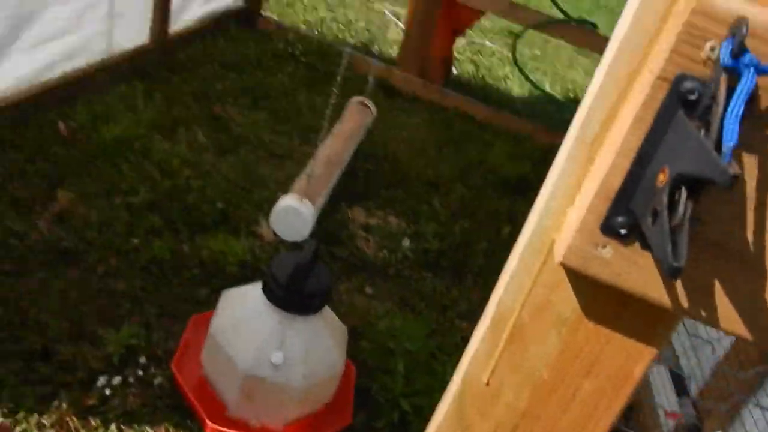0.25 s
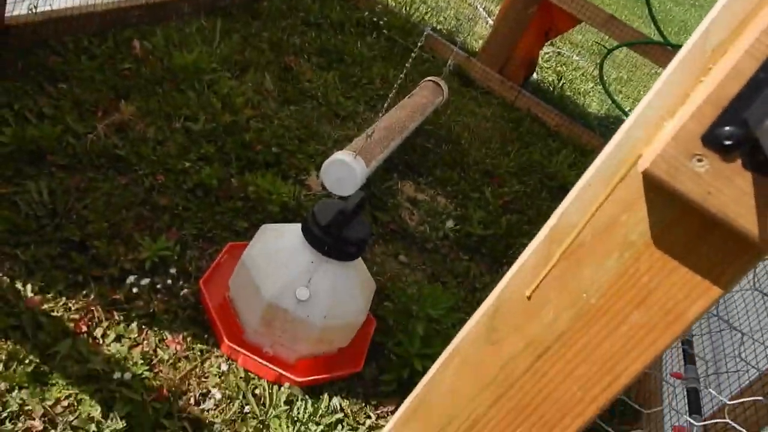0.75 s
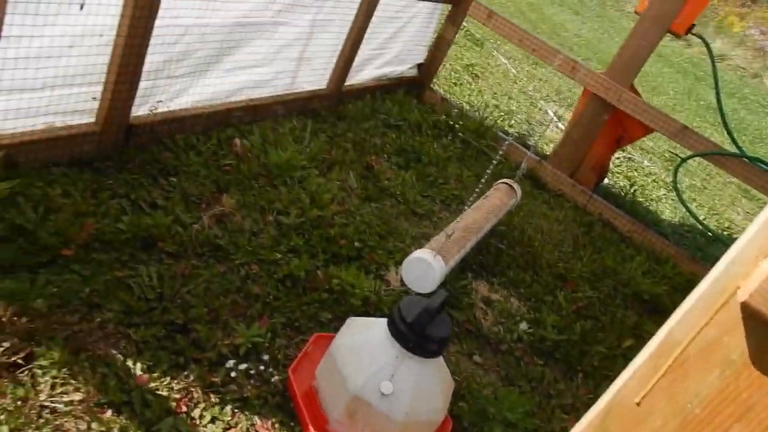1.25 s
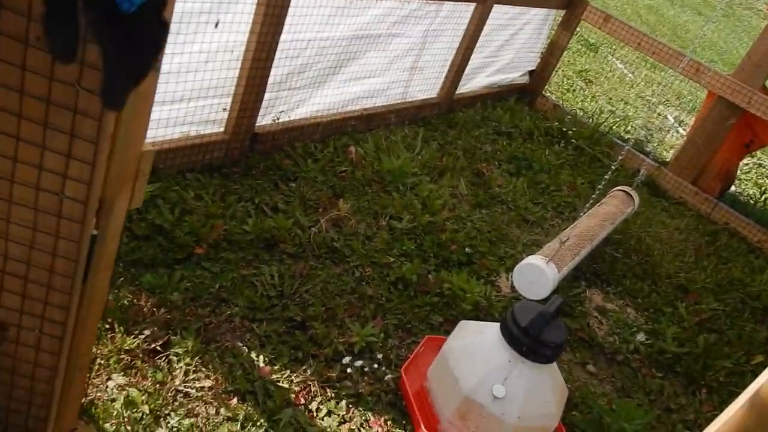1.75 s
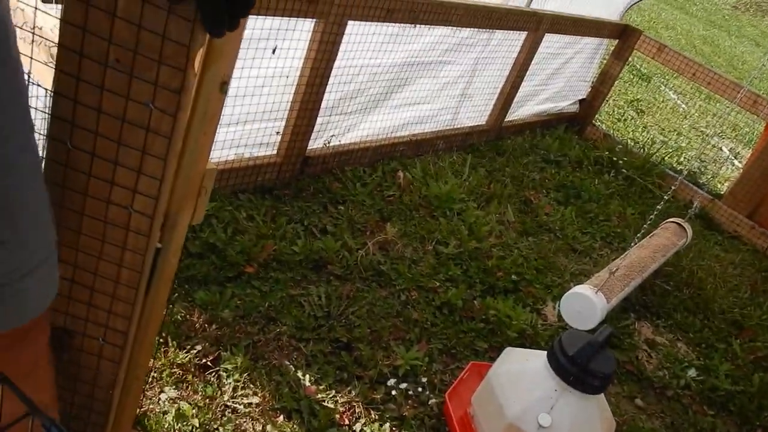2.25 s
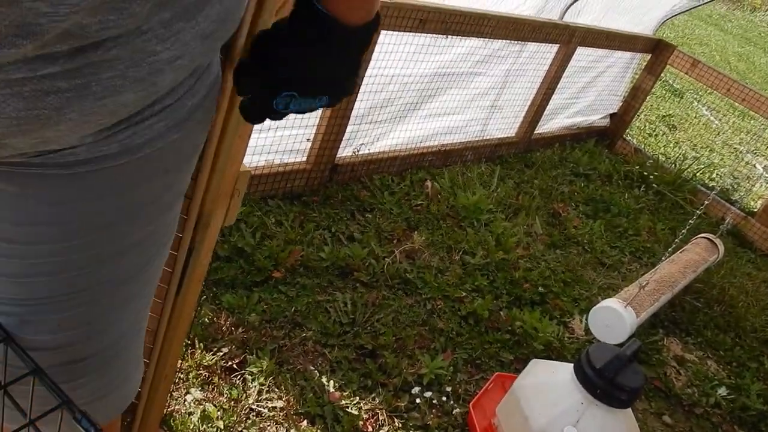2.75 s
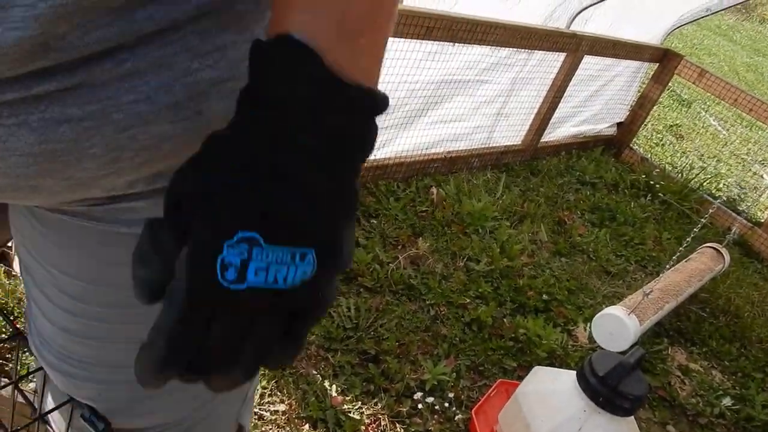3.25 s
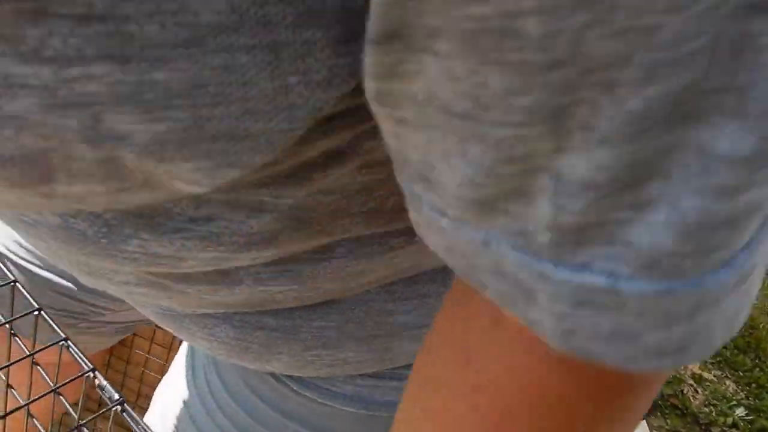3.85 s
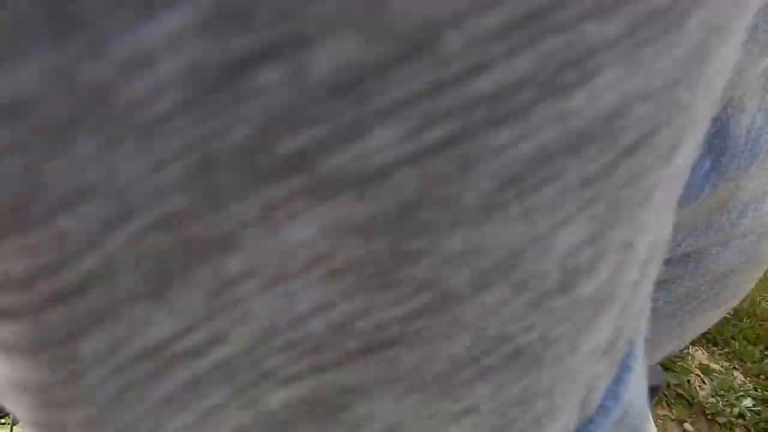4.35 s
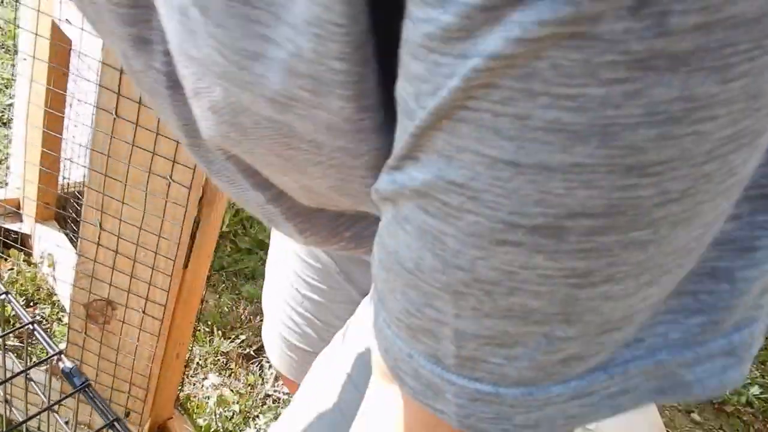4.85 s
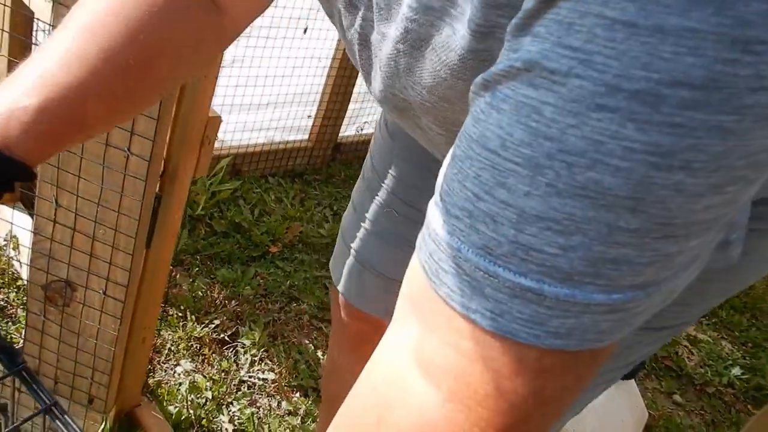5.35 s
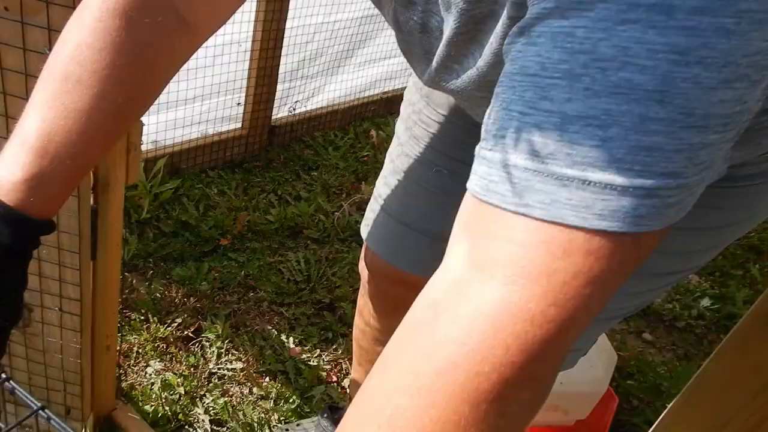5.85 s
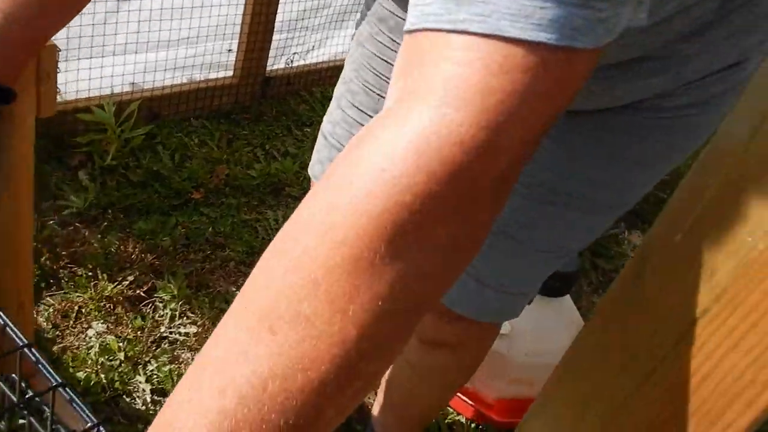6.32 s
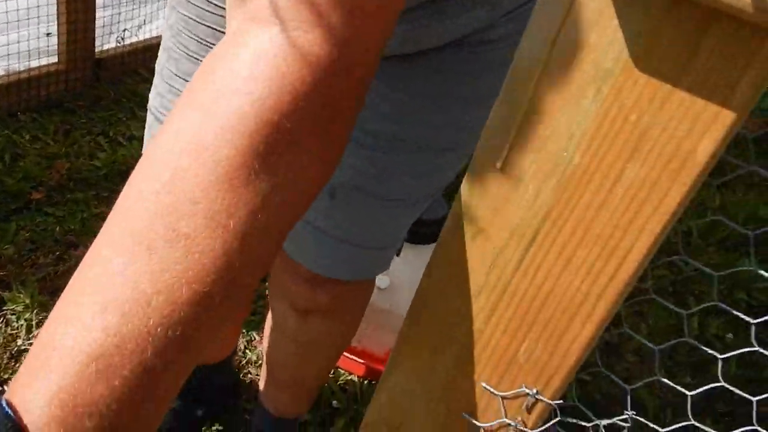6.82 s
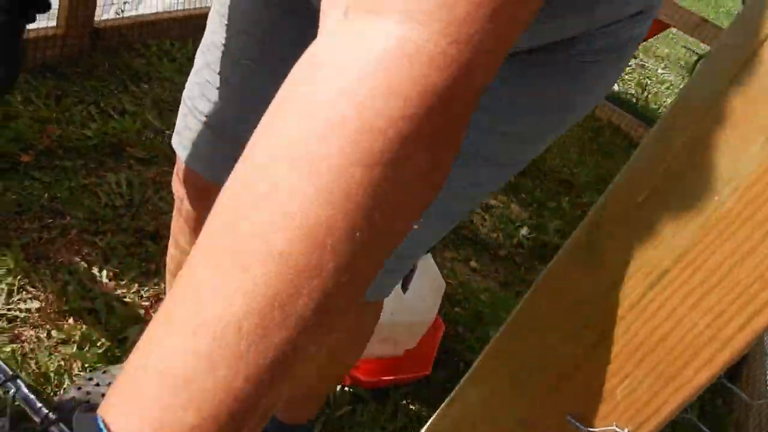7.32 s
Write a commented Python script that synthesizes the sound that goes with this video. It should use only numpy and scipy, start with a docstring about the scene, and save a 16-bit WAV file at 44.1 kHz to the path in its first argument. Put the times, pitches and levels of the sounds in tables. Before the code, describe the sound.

Many young chicks peep close by, dense then sparse then busy again, as a wire crate clanks, taps and scrapes over grass outdoors.

```python
"""Young chicks peep close by in a wire crate that is being shifted through the door of a garden run.
Their calls are gliding sine whistles: falling or arched peeps, rasps with a low voice, chips and two trills;
fainter chicks peep at the back. Noise bursts and decaying sines make the crate clank, shiver, tick and ping.
Grainy coloured noise makes the grass, wood and cloth, dying low sines the bumps, and steady low noise
the faint outdoor rumble under it all."""
import sys
import numpy as np
from scipy import signal
from scipy.fft import rfft, irfft, next_fast_len
from scipy.io import wavfile
from scipy.ndimage import uniform_filter1d, map_coordinates

SR = 44100
rng = np.random.default_rng(int(sys.argv[2]) if len(sys.argv) > 2 else 0)


def to_wav(s):
    """Save 16-bit WAV."""
    ch = np.atleast_2d(s).T  # columns
    pcm = np.round(np.clip(ch, -1, 1) * 32767)  # PCM
    wavfile.write(sys.argv[1], SR, pcm.astype(np.int16))


N = 334278
TIME = np.arange(N) / SR

# Near chicks, clear falling peeps: t/s, length/s, start f/Hz, end f/Hz, level/dB
FALLING_PEEPS = [(0.04, 0.12, 3655, 1977, -33), (0.085, 0.018, 2300, 1854, -22),
                 (.088, 0.085, 2743, 2110, -25.5), (.335, .035, 3460, 2450, -32.5),
                 (0.365, 0.064, 4070, 3240, -39), (0.428, 0.083, 2670, 1690, -27.5),
                 (0.553, 0.057, 3040, 2130, -28.5), (0.629, 0.056, 2900, 1950, -31.5),
                 (0.787, 0.067, 4010, 3050, -35.5), (0.836, 0.07, 2520, 2180, -25.5),
                 (0.91, 0.084, 2450, 1986, -30.5), (1.026, 0.092, 2664, 1697, -26),
                 (1.072, 0.089, 3320, 2073, -25), (1.15, .075, 2906, 2180, -28),
                 (1.406, 0.11, 3270, 2298, -26), (1.45, 0.021, 2300, 1860, -30.5),
                 (1.545, 0.056, 2600, 2060, -36.5), (1.614, 0.044, 3190, 1984, -29.5),
                 (1.684, 0.025, 3180, 2255, -29.5), (3.553, 0.033, 2900, 1870, -35),
                 (3.682, 0.041, 2500, 2054, -30.5), (3.736, 0.045, 2980, 2273, -18.5),
                 (3.831, 0.031, 2700, 2110, -29.5), (3.876, 0.084, 2844, 2196, -26.5),
                 (3.992, 0.055, 2760, 1900, -30.5), (4.23, 0.067, 3200, 2600, -42),
                 (4.261, 0.059, 2460, 1995, -32), (4.401, 0.07, 3200, 2310, -31),
                 (4.495, 0.038, 2700, 1955, -27), (4.742, 0.033, 2900, 1790, -22.5),
                 (4.778, 0.078, 2740, 1870, -32), (4.835, 0.086, 2440, 1950, -35.5),
                 (4.943, 0.061, 2280, 1980, -34.5), (5.076, 0.073, 2890, 2040, -28),
                 (5.088, 0.038, 3550, 2520, -29), (5.175, 0.045, 3130, 1874, -26.5),
                 (5.375, 0.041, 3357, 2190, -29), (5.472, 0.054, 2285, 1774, -29),
                 (5.667, 0.01, 2330, 1980, -22.5), (5.863, 0.048, 3020, 1930, -31),
                 (5.969, 0.027, 2586, 2050, -21.5), (6.405, 0.038, 2550, 1540, -24.5),
                 (6.473, 0.056, 2790, 2225, -22.5), (6.604, 0.016, 2760, 2100, -21.5),
                 (6.659, 0.025, 2780, 2240, -34), (6.839, 0.045, 2590, 1980, -35),
                 (6.944, 0.086, 4230, 3420, -37.5), (7.279, 0.071, 3630, 2100, -34.5),
                 (7.458, 0.055, 2690, 1743, -30.5)]
# Near chicks, arched peeps sung with both sides of the syrinx:
# t/s, length/s, top f/Hz, level/dB, upper voice level/dB re the lower
ARCHED_PEEPS = [(0.27, 0.095, 2587, -23, -21), (0.515, 0.071, 2736, -29.5, -1),
                (0.66, 0.086, 2850, -27.5, -5), (2.542, 0.12, 2883, -33, -15),
                (2.756, 0.068, 2994, -35, -12), (2.952, 0.074, 2800, -37.5, -33),
                (3.135, 0.093, 2794, -33, -4.5), (3.302, 0.084, 2930, -36.5, -8.5),
                (3.476, 0.093, 3130, -38, -29), (4.567, 0.072, 2835, -26, -7.5),
                (5.538, 0.093, 2887, -26, -11.5), (7.008, 0.074, 2534, -19.5, -28),
                (7.517, 0.1, 2634, -27, -6)]
# Near chicks, strained peeps with a low voice breaking in: t/s, length/s, start f/Hz, low voice f/Hz, level/dB
RASPY_PEEPS = [(0.517, 0.034, 2237, 1063, -30.5), (1.344, 0.074, 2820, 994, -29.5),
               (1.803, 0.044, 2970, 928, -24), (2.391, 0.05, 2890, 1133, -31.5),
               (3.95, 0.047, 2607, 1145, -28.5), (4.108, 0.044, 2280, 1083, -35),
               (4.666, 0.079, 2514, 1117, -31), (4.9, 0.0397, 2227, 1060, -31),
               (5.018, 0.047, 2660, 1169, -29.5), (5.231, 0.0307, 2450, 1430, -33),
               (6.219, 0.029, 2600, 1365, -30.5), (6.626, 0.024, 2495, 1180, -31),
               (6.803, 0.043, 2784, 1200, -26), (7.379, 0.067, 2610, 1034, -31.5)]
# Near chicks, short chips: t/s, held f/Hz, level/dB
CHIP_CALLS = [(0.255, 1646, -30.5), (0.331, 1094, -34), (0.414, 1470, -32.5), (0.845, 1140, -31.5),
              (1.514, 1384, -27.5), (1.835, 1620, -31), (3.264, 1432, -19.5), (3.723, 1410, -25.5),
              (5.234, 1420, -27.5), (5.403, 1674, -26), (5.662, 1444, -28), (6.218, 1516, -27.5)]
# Near chicks, trills: t/s, length/s, start f/Hz, end f/Hz, swing f/Hz, warble rate/Hz, level/dB, gap depth/0-1
TRILL_CALLS = [(3.221, 0.087, 3007, 2530, 422, 42, -22, 0.94),
               (7.001, 0.083, 3465, 2604, 320, 45, -21.5, 0.06)]
# Crate, jolts that set the mesh rattling: t/s, level/dB, t60 of the rattle/s
MESH_JOLTS = [(.992, -32.5, 0.9), (3.326, -41.5, 0.46), (3.806, -31, 0.4), (4.471, -34.5, 0.48),
              (6.01, -26.5, 0.4), (6.02, -31.5, 0.45), (6.062, -29, 0.33), (6.692, -18, 0.061),
              (6.705, -27.5, 0.35), (7.045, -37, 0.79)]
# Crate, single taps of wire on wood: t/s, level/dB
WIRE_TAPS = [(2.843, -28), (3.976, -22.5), (4.868, -34), (4.9257, -34.5), (5.151, -46), (5.298, -33),
             (5.313, -36), (5.5965, -24.5), (5.71, -46), (6.826, -26), (7.1415, -19)]
# Crate, ringing modes of the mesh: f/Hz, level/dB
MESH_MODES = [(3009, -0.5), (3331, 6.5), (3560, -3), (5170, 7.5), (5420, 15), (7897, -15)]
# Crate, pings of a loose wire: t/s, level/dB
WIRE_PINGS = [(3.812, -38), (6.755, -41.5), (7.149, -43)]
# Crate, modes of that loose wire: f/Hz, level/dB
LOOSE_WIRE_MODES = [(8800, -1), (14150, -20), (15300, -19)]
# Feet and crate shuffling over the grass: t/s, hold/s, level/dB
GRASS_SCUFFS = [(0, .39, -45), (.45, 0.795, -48.5), (3.33, 0.705, -48.5), (4.49, 0.22, -49),
                (4.75, 0.93, -54.5), (5.72, 0.9, -47), (6.37, 0.075, -40), (6.72, 0.453, -40.5),
                (7.2, 0.3, -47)]
# Crate scraping along the wooden door frame: t/s, hold/s, level/dB
FRAME_SCRAPES = [(2.543, 0.027, -40), (2.58, 0.29, -47.5), (4.22, 0.19, -48), (5.68, 0.34, -43),
                 (7.39, 0.052, -34)]
# Rustle of clothes and wire, rising and falling: t/s, level/dB
RUSTLE_COURSE = [(0.0, -40), (1.06, -48), (1.2, -44), (1.63, -47), (1.88, -50), (2.7, -40.5), (3.04, -45),
                 (3.95, -43.5), (4.24, -46.5), (4.66, -43.5), (5.4, -49.5), (5.7, -39.5), (6.46, -47.5),
                 (6.63, -40), (7.3, -40), (7.58, -45)]
# Bright brushes along the mesh: t of the peak/s, level/dB, rise time constant/s, t60/s
MESH_BRUSHES = [(2.119, -35, 0.028, 0.68), (3.78, -46, 0.18, 1), (5.861, -42, .06, 0.29)]
# Dull knocks of the crate and bumps on the microphone: t/s, level/dB, f/Hz
DULL_BUMPS = [(0.119, -18, 120), (0.216, -19.5, 268), (0.239, -13.5, 102), (.654, -24, 236),
              (.794, -25, 254), (3.577, -19, 310), (4.691, -22.5, 247), (5.875, -27, 78), (6.42, -35, 315)]
# Relative spectrum of the mesh contacts and taps: f/Hz, level/dB (per Hz)
MESH_SPECTRUM = [(120, -9.5), (250, 4), (800, -3), (3000, -1), (5400, -1), (6800, -13.5), (12500, -24.5),
                 (15500, -32.5)]
# Relative spectrum of the grass scuffs: f/Hz, level/dB (per Hz)
SCUFF_SPECTRUM = [(60, -8.5), (290, 7.5), (480, -2.5), (2000, -12), (4000, -44.5)]
# Relative spectrum of the scrapes on wood: f/Hz, level/dB (per Hz)
SCRAPE_SPECTRUM = [(300, -9), (550, -6), (780, -1), (1300, -10.5), (1800, -1), (4000, -48)]
# Relative spectrum of the clothes and wire: f/Hz, level/dB (per Hz)
RUSTLE_SPECTRUM = [(900, 13.5), (2600, 15), (3900, 8), (5200, 10), (6800, -9.5), (12000, -23.5),
                   (15000, -58.5)]
# Relative spectrum of the brushes along the mesh: f/Hz, level/dB (per Hz)
BRUSH_SPECTRUM = [(800, -13), (2800, -3), (5200, 5), (7000, -13.5), (12500, -23), (15000, -40)]
# Relative spectrum of the outdoor rumble: f/Hz, level/dB (per Hz)
OUTDOOR_SPECTRUM = [(25, -6), (70, 2), (108, 11), (160, -3), (400, -29.5), (2000, -40), (8000, -41)]
# Likeness of the left and right noise: f/Hz, likeness/0-1
STEREO_LIKENESS = [(2000, 0.97), (5000, 0.48), (9000, 0)]

# The voice slides in faintly from above and trails off below: length, interval, level at the far ends
SLIDE_S, SLIDE_OCT, SLIDE_DB = .018, 0.1323, -16
SAG = 0.0265  # share by which the middle of a fall hangs below an even glide
# Arch: rise and fall as shares of the top pitch; top as a share of the length; upper over lower pitch
ARCH_RISE, ARCH_FALL, ARCH_TOP_AT, UPPER_VOICE_RATIO = 0.0916, .26, 0.2786, 1.247
RASP_END_HZ, RASP_GRAIN = 2077, .5
LOW_VOICE_DB, LOW_VOICE_FALL_OCT = -4, 0.247  # level re its peep; sink over the call
LOW_VOICE_JITTER, LOW_VOICE_FLUTTER_DB = .075, 4.5  # spread of pitch as a share; spread of each harmonic
CHIP_S, CHIP_START_OCT, CHIP_DROP_S = 0.023, 0.59, 0.00278  # length; start above the held pitch; time constant
MELLOW_OCTAVE_DB = -28  # second harmonic of chips and trills
# Second harmonic of peeps; spread of any second harmonic; pitch up to which the beak passes it
OCTAVE_DB, OCTAVE_SPREAD_DB, BEAK_CUT_HZ = -24, 4, 5500
# Far chicks: level re the near peep; middle pitch and largest departure; strain 0-1
FAR_DB, FAR_HZ, FAR_SPREAD_OCT, FAR_RASP = -12.5, 2896, 0.2, .9
FAR_S, FAR_WITHIN_S = .065, .03  # middle length; largest lead or lag on the near peep
STROKE_ATTACK_S, STROKE_T60_S = 0.0036, 0.17  # swell and dying away of each scuff or scrape
OUTDOORS_DB, LEFT_DB = -53, 1.5  # rumble level; lift on the left and equal cut on the right
CUTOFF_HZ = 15500


def chicks():
    """The nearest chicks peep, rasp, chip and trill, each call from its own place in the crate."""
    out = np.zeros((2, N))
    for s, level_db, call in falling_peeps() + arched_peeps() + raspy_peeps() + chips() + trills():
        add(out, s, somewhere_in_crate(from_db(level_db) * call))
    return out


def falling_peeps():
    """Clear falling whistles, loudest where their pitch comes nearest the throat resonance."""
    return [(s - SLIDE_S, level_db, peep(fall(length, start_hz, end_hz)))
            for s, length, start_hz, end_hz, level_db in FALLING_PEEPS]


def arched_peeps():
    """Both sides of the syrinx sing the same arch at a fixed pitch ratio."""
    calls = []
    for s, length, top_hz, level_db, upper_db in ARCHED_PEEPS:
        hz = arch(length, top_hz)
        lower = peep(hz, ends_db=-9)
        upper = peep(hz * UPPER_VOICE_RATIO, ends_db=-8)
        calls.append((s - SLIDE_S, level_db, lower + from_db(upper_db) * upper))
    return calls


def raspy_peeps():
    """A strained falling whistle, with a low voice breaking in under it."""
    calls = []
    for s, length, start_hz, low_hz, level_db in RASPY_PEEPS:
        whistle = peep(fall(length, start_hz, RASP_END_HZ), rasp=1, ends_db=-2.0)
        calls.append((s - SLIDE_S, level_db, whistle))
        calls.append((s, level_db + LOW_VOICE_DB, low_voice(length, low_hz)))
    return calls


def chips(edge=0.067):
    """Short whistles that drop very quickly onto a held pitch."""
    calls = []
    for s, held_hz, level_db in CHIP_CALLS:
        u = progress(CHIP_S)
        hz = held_hz * 2 ** (CHIP_START_OCT * np.exp(-u * CHIP_S / CHIP_DROP_S))
        calls.append((s, level_db, syrinx(hz, MELLOW_OCTAVE_DB) * swell(u, edge)))
    return calls


def trills(edge=0.48):
    """Whistles whose pitch warbles as it sinks."""
    calls = []
    for s, length, start_hz, end_hz, swing_hz, rate, level_db, gaps in TRILL_CALLS:
        u = progress(length)
        warble = np.cos(2 * np.pi * rate * length * u)
        hz = start_hz + (end_hz - start_hz) * u + swing_hz * warble
        # the voice weakens at the top of every warble, by the gap depth
        voiced = 1 - np.clip(gaps * np.minimum(.5 + 2 * warble, 1), 0, 1)
        calls.append((s, level_db, syrinx(hz, MELLOW_OCTAVE_DB) * voiced * swell(u, edge)))
    return calls


def peep(hz, rasp=0, ends_db=-9, throat_hz=2420, throat_width_hz=620):
    """One call swells and fades along its pitch, favoured near the throat resonance."""
    slide = round(SLIDE_S * SR)
    body = from_db(ends_db * np.linspace(-1, 1, len(hz)) ** 2)
    padded = np.pad(body, slide, constant_values=from_db(SLIDE_DB))
    envelope = uniform_filter1d(padded, size=200)
    slide_ends = (hz[0] * 2 ** SLIDE_OCT, hz[-1] / 2 ** SLIDE_OCT)
    hz = np.pad(hz, slide, "linear_ramp", end_values=slide_ends)
    throat = 1 / np.hypot(1, (hz - throat_hz) / throat_width_hz)
    loudness = envelope * np.hanning(len(hz)) ** 0.083 * throat
    return syrinx(hz, OCTAVE_DB, rasp) * loudness / loudness.max()


def syrinx(hz, octave_db, rasp=0, waver=.013, jitter=0.0091, rasp_jitter=0.035,
           flutter_db=3.0, rasp_flutter_db=4):
    """A slightly hoarse whistle with its octave; under strain the pitch shakes and the air flow catches abruptly."""
    size = len(hz)
    shake = (jitter + rasp_jitter * rasp) * drift(880.4, size)
    hz = hz * (1 + waver * drift(170, size) + shake)
    phase = 2 * np.pi * np.cumsum(hz) / SR
    catches = from_db((flutter_db + rasp_flutter_db * rasp) * np.tanh(2 * drift(149.8, size)))
    beak = 1 / np.hypot(1, (hz / BEAK_CUT_HZ * 2) ** 10)
    octave = from_db(octave_db + OCTAVE_SPREAD_DB * drift(18, size)) * np.sin(2 * phase) * beak
    grain = 1 + (0.12 + RASP_GRAIN * rasp) * drift(1300, size)
    return rms_one((np.sin(phase) + octave) * catches * grain)


def low_voice(length, low_hz, fundamental_db=-5, third_db=-6):
    """A rough, broken, sinking tone of its own pitch; the throat favours its second harmonic."""
    u = progress(length)
    sinking = low_hz * 2 ** (LOW_VOICE_FALL_OCT * (.5 - u))
    hz = sinking * (1 + LOW_VOICE_JITTER * drift(694, len(u)))
    phase = 2 * np.pi * np.cumsum(hz) / SR
    voice = np.zeros(len(u))
    for k, db in enumerate((fundamental_db, 0, third_db), 1):
        flutter = LOW_VOICE_FLUTTER_DB * drift(197, len(u))
        voice += from_db(db + flutter) * np.sin(k * phase)
    return rms_one(voice) * swell(u, 0.22)


def progress(length):
    """0..1 over a call of this length in seconds."""
    return np.linspace(0, 1, round(length * SR))


def fall(length, start_hz, end_hz):
    """Pitch of a falling peep: steep at first, then easing."""
    u = progress(length)
    return start_hz * (end_hz / start_hz) ** u * (1 - SAG * np.sin(np.pi * u))


def arch(length, top_hz):
    """Pitch of an arched peep: a short rise, a rounded top, a longer fall."""
    past_top = progress(length) - ARCH_TOP_AT
    rising = ARCH_RISE * (past_top / ARCH_TOP_AT) ** 2
    falling = ARCH_FALL * np.abs(past_top / (1 - ARCH_TOP_AT)) ** 1.2
    return top_hz * (1 - np.where(past_top < 0, rising, falling))


def swell(u, edge):
    """Rounded rise and fall over u = 0..1; a small edge makes both steep, but never quicker than a few ms."""
    from_ends_s = np.minimum(u, 1 - u) * len(u) / SR
    return np.abs(np.sin(np.pi * u)) ** edge * np.tanh(from_ends_s / .0015) ** 2


def somewhere_in_crate(sound, count=3):
    """Each call has its own place, with its own quick reflections from the tray and boards nearby."""
    out = np.zeros((2, len(sound) + SR // 20))
    add(out, 0, sound)
    for delay in rng.uniform(.001, .014, count):
        add(out, delay, sound * rng.normal(0, .13))
    balance_db = .4 * rng.standard_normal() * np.array([[1], [-1]])
    return out * from_db(balance_db)


def far_chicks():
    """Chicks at the back peep faintly around each near falling peep, louder around loud ones."""
    out = np.zeros((2, N))
    for s, _, _, _, level_db in FALLING_PEEPS:
        lag, stretch, pitch = rng.uniform(-1, 1, size=3)
        hz = arch(FAR_S * 1.7 ** stretch, FAR_HZ * 2 ** (FAR_SPREAD_OCT * pitch))
        call = from_db(level_db + FAR_DB) * peep(hz, FAR_RASP)
        add(out, s - SLIDE_S + FAR_WITHIN_S * lag, somewhere_in_crate(call))
    return out


def crate(wire_db=-19):
    """Struck mesh and wood give short noisy contacts, over which the wires ring and ping."""
    contacts, ringing = rattles()
    return colour(contacts + taps(), MESH_SPECTRUM) + from_db(wire_db) * ringing + pings()


def rattles(rise_s=0.00041):
    """Jolts make the loose panels chatter in uneven, dying bursts; every jolt rings the wires in its own way."""
    contacts, ringing, t = np.zeros((2, N)), np.zeros((2, N)), TIME[:SR]
    for s, level_db, t60 in MESH_JOLTS:
        envelope = from_db(level_db - 60 * t / t60) * np.tanh(t / rise_s)
        rattle = envelope * rebounds() * rng.standard_normal((2, SR))
        add(contacts, s, rattle)
        add(ringing, s, signal.fftconvolve(rattle, wire_ring()[None], axes=1))
    return contacts, ringing


def rebounds(per_s=90, size=SR):
    """Envelope of loose wires striking again and again at uneven moments, each strike sharp and short; rms 1."""
    strikes = (rng.random(size) < per_s / SR) * rng.uniform(.3, 1, size)
    dying = signal.lfilter([1], [1, -np.exp(-1 / (.004 * SR))], strikes)  # 4 ms time constant
    return rms_one(.45 + dying)


def wire_ring(t60=0.13, size=SR // 2, count=3):
    """Ring of the mesh when struck at a random place: each place favours other wires."""
    hz, level_db = np.repeat(MESH_MODES, count, axis=0).T
    # neighbouring wires are tuned slightly apart, so their ring beats
    hz = hz * (1 + .004 * rng.standard_normal(len(hz)))
    strength = from_db(level_db) * rng.standard_normal(len(hz)) / np.sqrt(count)
    decay = from_db(-60 * TIME[:size] / t60)
    tones = strength @ np.sin(2 * np.pi * np.outer(hz, TIME[:size]))
    return tones * decay / np.sqrt(np.sum(decay ** 2) / 2)


def taps(t60=0.011, trim_db=-2):
    """Single taps are dying noise bursts; wood cushions them, so they are duller."""
    envelope = np.zeros(N)
    for s, level_db in WIRE_TAPS:
        add(envelope, s, from_db(level_db + trim_db - 60 * TIME[:SR // 10] / t60))
    cushion = signal.butter(2, 5000, fs=SR, output="sos")
    return signal.sosfilt(cushion, envelope * rng.standard_normal((2, N)) + 1e-18)


def pings(t60=0.26):
    """A free wire end rings high and thin."""
    out, t = np.zeros(N), TIME[:SR]
    ring = sum(from_db(db - 60 * t / t60) * np.sin(2 * np.pi * hz * t) for hz, db in LOOSE_WIRE_MODES)
    for s, level_db in WIRE_PINGS:
        add(out, s, from_db(level_db) * ring)
    return out


def handling(scuff_db=1, rustle_db=-4):
    """Feet scuff the grass and the crate scrapes wood while cloth and wire rustle, all in grainy contacts."""
    strokes_db = 2 * drift(30, N)  # shared unevenness
    scuff = pushes(GRASS_SCUFFS) * from_db(scuff_db + strokes_db) * grains(per_s=150, spread_db=3.0)
    scrape = pushes(FRAME_SCRAPES) * from_db(strokes_db) * grains(per_s=180, spread_db=3.0)
    course_db = np.interp(TIME, *np.transpose(RUSTLE_COURSE))
    rustle = from_db(course_db + rustle_db + strokes_db / 2) * grains(per_s=730, spread_db=3.5)
    ground_and_wood = colour(scuff, SCUFF_SPECTRUM) + colour(scrape, SCRAPE_SPECTRUM)
    return ground_and_wood + colour(rustle, RUSTLE_SPECTRUM) + brushes()


def brushes():
    """Long bright noise swells up and dies away as something brushes along the mesh."""
    envelope = np.zeros(N)
    for s, level_db, rise, t60 in MESH_BRUSHES:
        dying = from_db(level_db - 60 * np.maximum(TIME - s, 0) / t60)
        envelope += dying * np.exp(np.minimum(TIME - s, 0) / rise)
    return colour(envelope * rng.standard_normal((2, N)), BRUSH_SPECTRUM)


def pushes(rows):
    """Summed envelope of strokes that each swell, hold and die away."""
    out, t = np.zeros(N), TIME[:2 * SR]
    for s, hold, level_db in rows:
        dying = from_db(level_db - 60 * np.maximum(t - hold, 0) / STROKE_T60_S)
        add(out, s, np.minimum(t / STROKE_ATTACK_S, 1) * dying)
    return out


def grains(per_s, spread_db):
    """Noise broken into tiny contacts of uneven strength; rms 1."""
    contact = np.cumsum(rng.random(N) < per_s / SR)
    strength = from_db(spread_db * np.clip(rng.standard_normal(N), -2, 2))[contact]
    return rms_one(strength * rng.standard_normal((2, N)))


def bumps(cycles=11, attack_s=0.0012):
    """Each knock is a few low cycles, dying by 60 dB over that many, heavier on the left."""
    out, t = np.zeros(N), TIME[:SR]
    for s, level_db, hz in DULL_BUMPS:
        dying = from_db(level_db - 60 * t * hz / cycles)
        add(out, s, dying * np.tanh(t / attack_s) * np.sin(2 * np.pi * hz * t))
    return out * [[1], [.7]]


def garden(x, t60=0.09, echo_db=-13):
    """Sparse short reflections from the timber frame, different at each side."""
    t = TIME[:SR // 2]
    sparse = (rng.random((2, len(t))) < .03) * (t > .002)
    echoes = rng.standard_normal((2, len(t))) * sparse * from_db(-60 * t / t60)
    echoes = rms_one(echoes) / np.sqrt(len(t))
    return x + from_db(echo_db) * signal.fftconvolve(x, echoes, axes=1)[:, :N]


def outdoors():
    """The faint outdoor rumble is steady noise, strongest in the bass."""
    return from_db(OUTDOORS_DB) * colour(rng.standard_normal((2, N)), OUTDOOR_SPECTRUM)


def colour(pair, spectrum):
    """Two unrelated signals become causal stereo sound with this spectrum, alike in the bass; power is kept."""
    size = next_fast_len(N + SR // 2)
    hz = np.arange(size // 2 + 1) * SR / size
    # folding the cepstrum forward gives a minimum-phase filter
    cepstrum = irfft(np.log(rms_one(from_db(at_hz(spectrum, hz)))), size)
    cepstrum[1:size // 2] *= 2
    cepstrum[size // 2 + 1:] = 0
    alike = np.clip(at_hz(STEREO_LIKENESS, hz), -1, 1)
    mid, side = rfft(pair, size) * np.exp(rfft(cepstrum))
    stereo = np.sqrt(1 + alike) * mid + np.sqrt(1 - alike) * side * [[1], [-1]]
    return irfft(stereo, size)[:, :N]


def at_hz(points, hz):
    """Read a table on a log-frequency axis."""
    return np.interp(np.log(hz + 1), np.log(np.array(points)[:, 0]), np.array(points)[:, 1])


def drift(rate, size):
    """Smooth chance of spread about 1 that changes about rate times a second."""
    knots = rng.standard_normal(4096)
    return map_coordinates(knots, [np.arange(size) * rate / SR], order=3, mode="wrap")


def from_db(db):
    """Decibels to gain."""
    return 10 ** (np.asarray(db) / 20)


def rms_one(x):
    """Scale to unit rms."""
    return x / np.sqrt(np.mean(x ** 2) + 1e-20)


def add(out, s, sound):
    """Mix a sound in from time s."""
    start = min(max(round(s * SR), 0), N)
    out[..., start:start + sound.shape[-1]] += sound[..., :N - start]


def scene():
    """Chicks and crate echo off the timber frame; the whole sits a little to the left."""
    echoing = garden(crate() + chicks() + far_chicks())
    return (echoing + handling() + bumps() + outdoors()) * from_db([[LEFT_DB], [-LEFT_DB]])


def record(dry):
    """A steep low-pass cuts the top."""
    return signal.sosfilt(signal.ellip(10, .1, 90, CUTOFF_HZ, fs=SR, output="sos"), dry)


dry = scene()
out = record(dry)
to_wav(out)
```